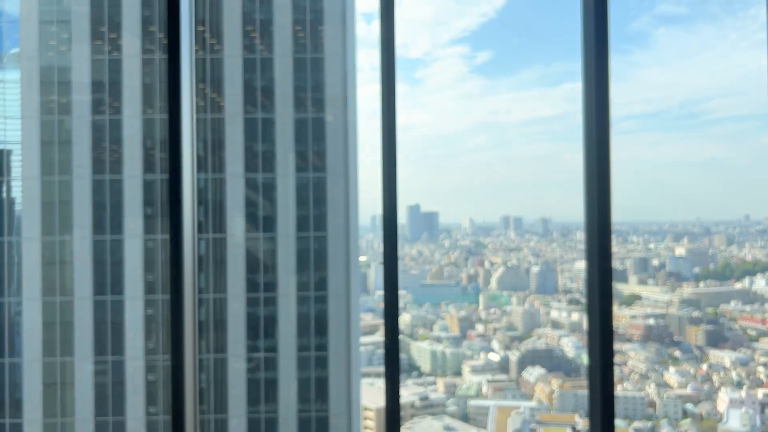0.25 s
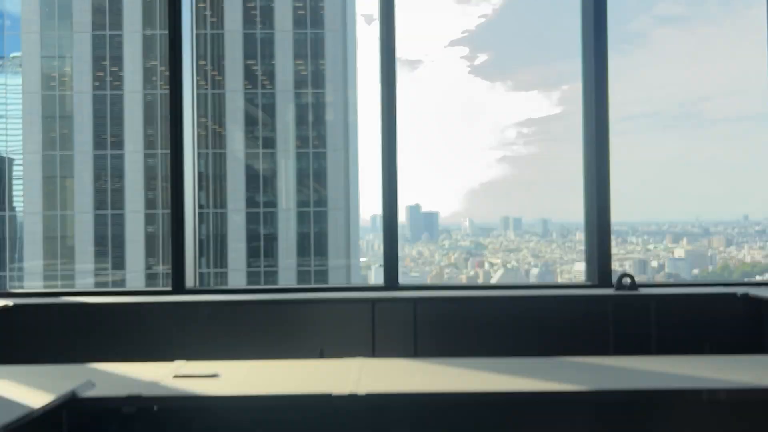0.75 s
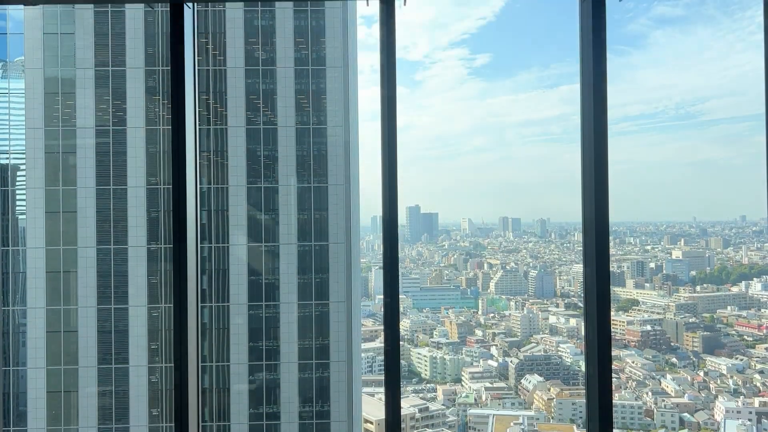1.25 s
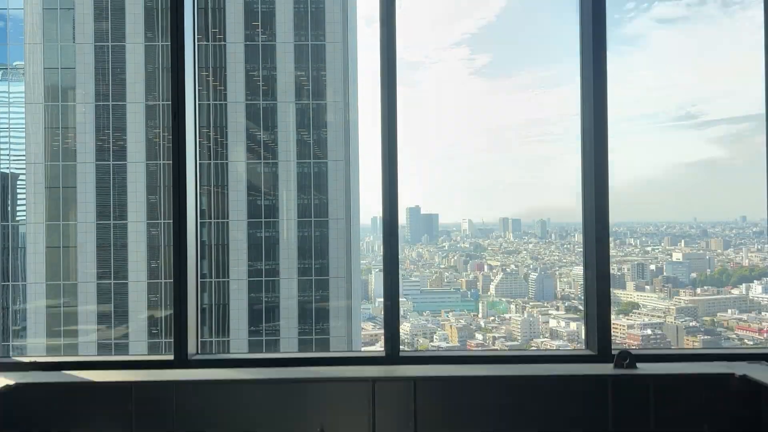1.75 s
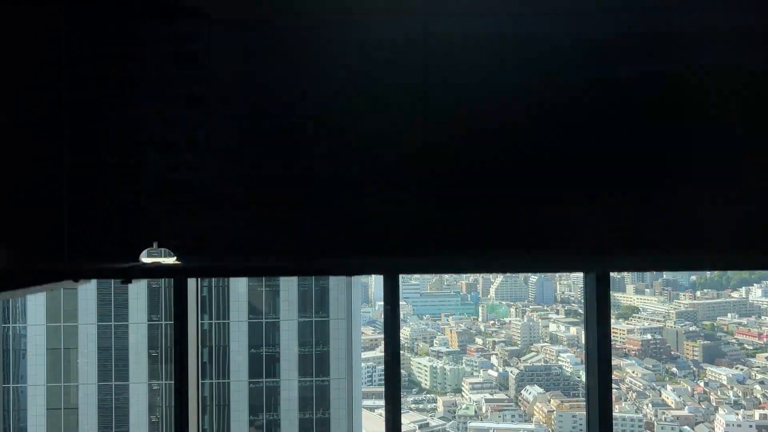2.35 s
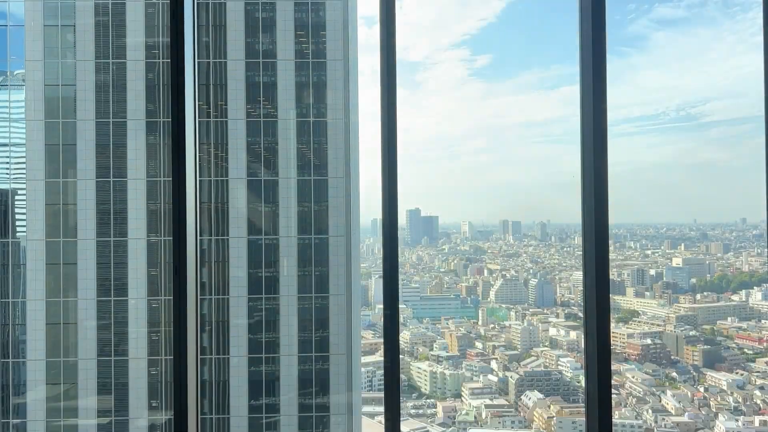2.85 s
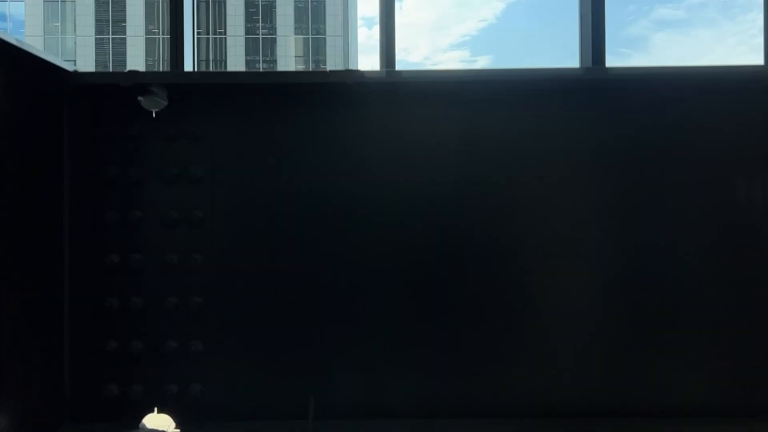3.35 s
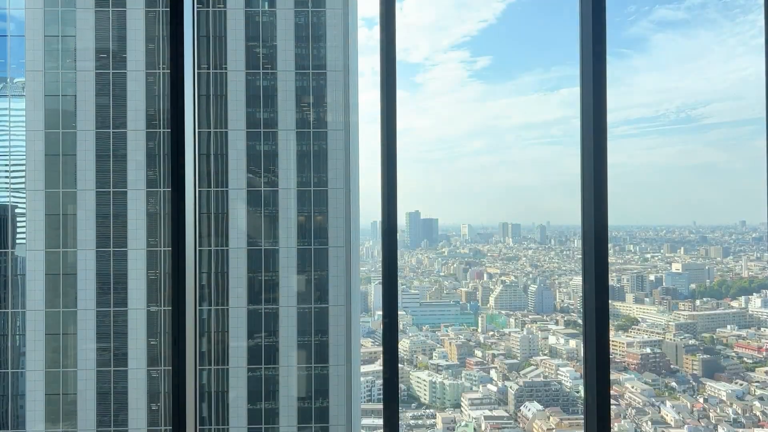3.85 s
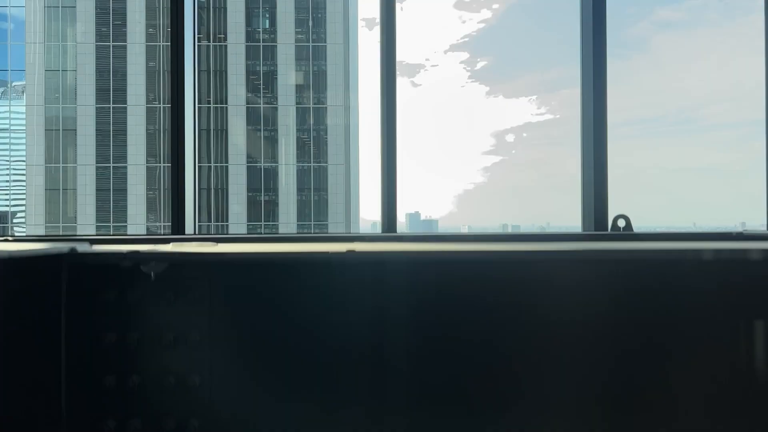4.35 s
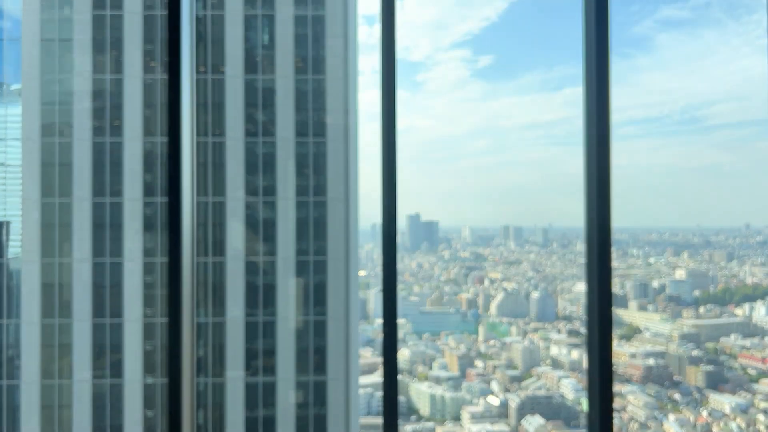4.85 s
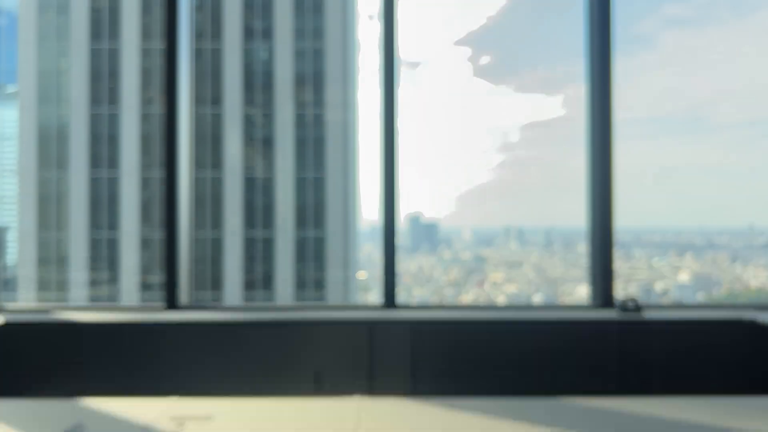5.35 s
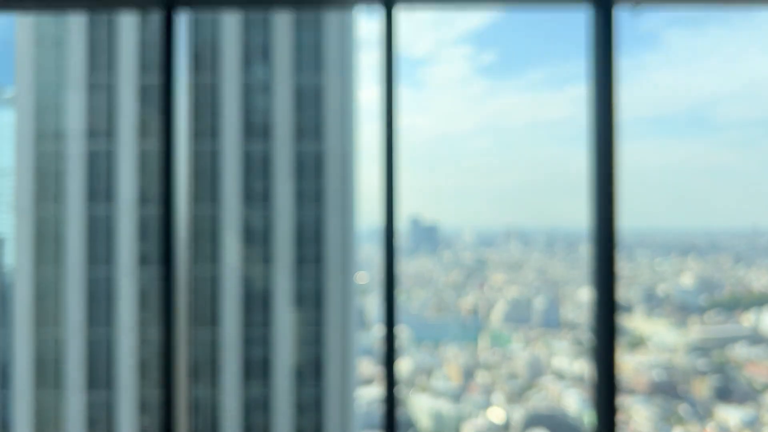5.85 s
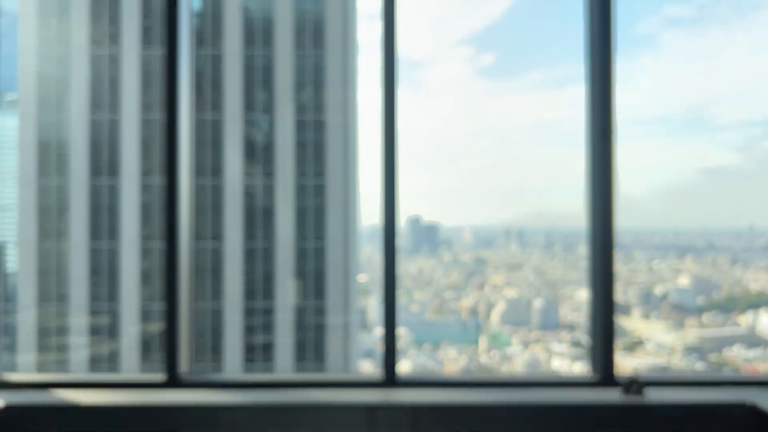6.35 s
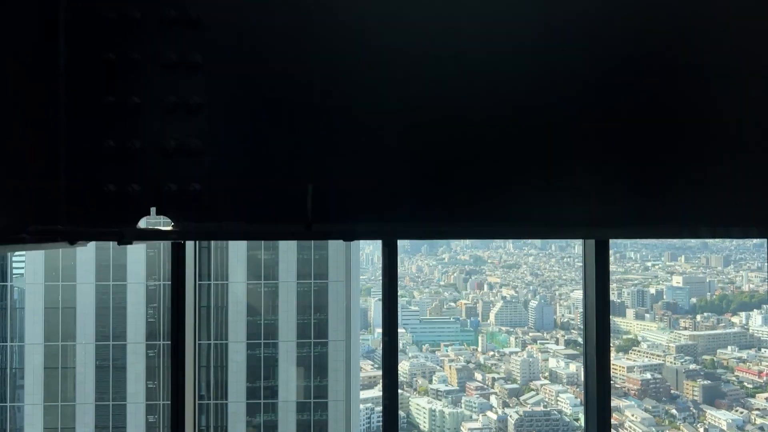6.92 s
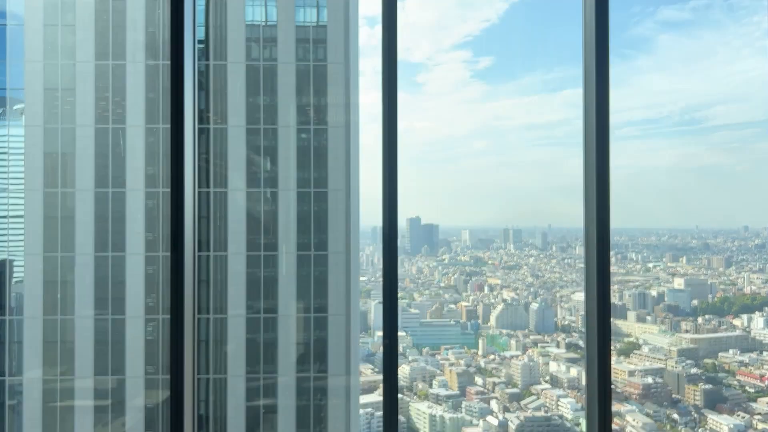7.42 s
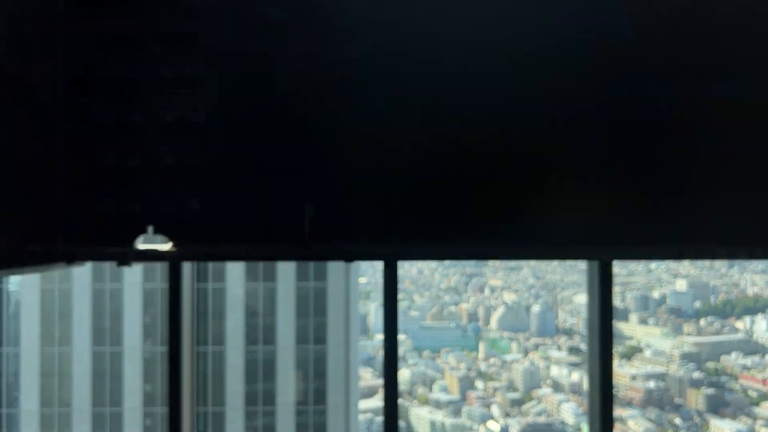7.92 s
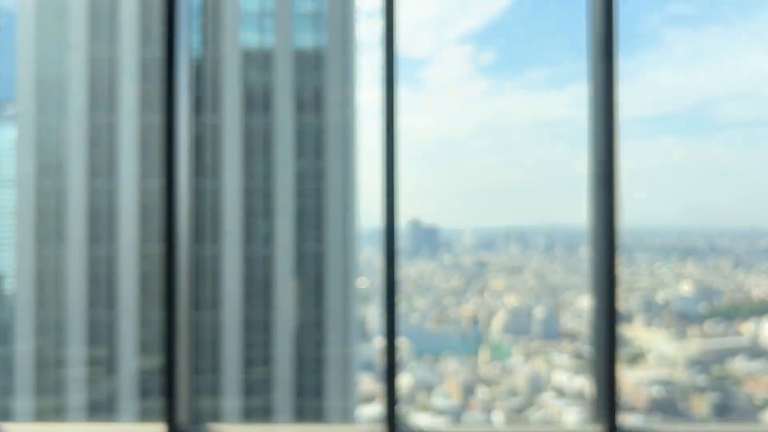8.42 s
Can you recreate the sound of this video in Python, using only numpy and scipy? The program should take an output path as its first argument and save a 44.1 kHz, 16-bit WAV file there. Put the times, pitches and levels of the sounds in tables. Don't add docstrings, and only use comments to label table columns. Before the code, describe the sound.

Steady deep elevator drone with airy shaft rush swelling towards the end, a brief thin squeal midway and small handling taps near the microphone.

```python
import sys
import numpy as np
from scipy import signal
from scipy.fft import rfft, irfft, next_fast_len
from scipy.io import wavfile
from scipy.ndimage import uniform_filter1d

SR = 44100
rng = np.random.default_rng(int(sys.argv[2]) if len(sys.argv) > 2 else 0)


def volts_from_db(level):
    exponent = np.asarray(level, float) / 20
    return 10 ** exponent


def to_wav(sig):
    pcm = np.clip(np.atleast_2d(sig), -1, 1) * 32767
    pcm = np.round(pcm).astype(np.int16)
    wavfile.write(sys.argv[1], SR, pcm.T)


N = 382770
T = np.arange(N) / SR


def hum(shake):
    # (time [s], pitch [Hz], level [dB], throb depth [0-1])
    drive = [(0.0, 127, -44, 0.8), (.3, 127.8, -36.5, 0.4), (1.0, 128.6, -35, 0.8), (1.4, 128.4, -30.5, .4),
             (1.75, 125, -35.5, 0.9), (2.12, 127.6, -37.5, 0.6), (2.3, 128.7, -29, 0),
             (2.65, 128.5, -36.5, 0.2), (3.1, 124, -34.5, 0.8), (3.7, 128, -37, 0.4),
             (4.3, 127.2, -31.5, 0), (4.65, 128.4, -41, .5), (5.05, 127.5, -29.5, 0.1), (5.4, 125, -42, .3),
             (5.55, 127.3, -29, 0), (6.7, 127.9, -33, 0.1), (7.25, 124.3, -27, .2), (7.36, 122, -45, 0)]
    # (centre [Hz], width [Hz], rms level [dB])
    cab_modes = [(66, 7.1, -47), (78.7, 5.7, -52), (103, 5, -43), (112.1, 10, -45), (128, 14, -44.5)]
    # (start [s], length [s], pitch [Hz], level [dB])
    surges = [(0, 0.11, 60.9, -39.5), (0.485, 0.25, 69.2, -48), (0.857, 0.97, 63.8, -43.5),
              (0.949, .12, 103, -31.5), (1.551, 0.16, 110.4, -38.5), (1.902, 0.54, 64, -38.5),
              (1.95, 0.13, 114.3, -31.5), (2.35, 0.12, 78, -33), (2.64, 0.068, 112, -36),
              (2.814, 0.11, 77.4, -30.5), (3.63, 0.12, 91.7, -27.5), (4.088, 0.55, 84, -42),
              (4.154, .25, 107.6, -34), (4.5, 0.33, 103, -36), (4.851, .75, 103, -40),
              (5.144, .38, 51.3, -36), (5.919, .35, 66.1, -39.5), (6.296, .8, 103, -40.5),
              (6.297, 0.6, 69, -39), (7.189, 0.17, 112.9, -31), (7.196, 0.22, 72, -37.5),
              (7.43, 0.16, 63, -38), (7.551, 0.099, 117.5, -29), (8.16, .14, 104, -33),
              (8.33, .2, 98.9, -32), (3.0, 0.28, 190, -44), (7.75, 0.19, 112.5, -38.5),
              (8.302, 0.15, 65, -36.5), (8.5, 0.17, 128, -33.5), (8.552, 0.18, 102, -33.5)]
    brake_s, sag_hz_per_s = 7.36, 15
    throb_hz, throb_peak_s = 6.45, 0.5827

    hz, level_db, depth = curves(drive)
    hz = hz - sag_hz_per_s * np.maximum(T - brake_s, 0)
    throb = 1 + np.clip(depth, 0, 1) * np.cos(2 * np.pi * throb_hz * (T - throb_peak_s))
    out = volts_from_db(level_db) * throb * wavering(hz, shake, clean=0.85, fuzz=0.11, width=17)
    for mode_hz, width, db in cab_modes:
        out += volts_from_db(db) * evened(resonate(shake, mode_hz, width))
    for start, length, surge_hz, db in surges:
        part = slice(round(start * SR), round((start + length) * SR))
        pitch = surge_hz * np.ones(N)[part]
        surge = wavering(pitch, shake[:, part], clean=0.62, fuzz=0.25, width=39)
        fade = signal.windows.tukey(surge.shape[1], min(0.13 / length, 1))
        out[:, part] += volts_from_db(db) * fade * surge
    return out


def rumble(shake):
    # (centre [Hz], width [Hz], rms level [dB])
    panels = [(54.3, 12, -40), (152.5, 24, -44), (181, 6, -52), (236.2, 5, -53), (306.6, 5, -55),
              (337, 39, -67), (734, 21, -68), (833, 15, -73.5), (891, 26, -69.5)]
    # (frequency [Hz], density [dB per Hz])
    drone = [(20, -36.5), (32, -25.5), (45, -9.5), (70, -5.5), (128, -6), (160, -7.5), (200, -13),
             (312, -20), (420, -26.5), (700, -41), (1000, -76.5)]
    drone_db = -38.5

    def panel_gain(hz):
        gain = 0
        for centre, width, db in panels:
            peak = 1 / (1 + (2 * (hz - centre) / width) ** 2)
            gain = gain + volts_from_db(db) * np.sqrt(SR / width) * peak
        return gain

    return 0.22 * shaped(shake, panel_gain) + volts_from_db(drone_db) * noise(drone, 1.3, size=4096)


def air():
    # (time [s], gust [dB])
    gusts = [(0.0, 0), (.5, -1.24), (2.55, 0.5), (2.8, -0.4), (3.9, 0.1), (4.3, 2), (4.65, -0.5), (5.1, .5),
             (5.58, 3), (6.0, .5), (6.84, 4), (7.25, 4), (7.9, 3.5), (8.27, 6.5), (8.46, 4.5), (8.68, 6)]
    # (frequency [Hz], density [dB per Hz])
    roar = [(240, -26), (400, -3.5), (606, -9), (860, -5), (942, -11.5), (1060, -6.5), (1450, -23.5),
            (1880, -45.5), (3190, -120)]
    hiss = [(790, -35), (1350, -6), (2100, -2), (2440, -6.5), (3050, -14.5), (3960, -32.5), (6710, -120)]
    fizz = [(2000, -21), (2900, -11), (3500, 2.5), (5100, 2.5), (5700, -2.5), (6600, -4.5), (6900, -6),
            (7500, -9.5), (9600, -17.5), (10500, -29.5), (12000, -51.5)]
    climb_db_per_s = 0.36

    gust_db, = curves(gusts)
    roar_db = -58 + 1.03 * gust_db
    hiss_db = -60 + 0.72 * gust_db
    fizz_db = -72.5 + 0.13 * gust_db ** 2 + climb_db_per_s * T
    out = volts_from_db(roar_db) * noise(roar, 1.0)
    out += volts_from_db(hiss_db) * noise(hiss, 0.68)
    out += volts_from_db(fizz_db) * noise(fizz, 1.4)
    return out


def squeak():
    # (time [s], pitch [Hz], level [dB])
    shoe = [
        (3.06, 5100, -82),
        (3.12, 5185, -72),
        (3.34, 5180, -68.5),
        (3.4, 5165, -74),
        (3.54, 5150, -70.5),
        (3.71, 5165, -71),
        (3.76, 5070, -78),
        (3.83, 5125, -75),
        (3.9, 5090, -81),
    ]
    span = slice(round(shoe[0][0] * SR), round(shoe[-1][0] * SR))
    hz, level_db = (curve[span] for curve in curves(shoe))
    grit = rng.standard_normal((3, len(hz)))
    jitter_hz = 24 * evened(uniform_filter1d(grit[2], size=500))
    whistle = np.sqrt(2) * np.sin(2 * np.pi * np.cumsum(hz + jitter_hz) / SR)
    haze = evened(resonate(grit[0], hz, 80))
    neighbour = evened(resonate(grit[1], hz * 0.965, 200))
    sound = whistle + 0.61 * haze + 0.6 * neighbour
    flutter_db = 1.8 * evened(uniform_filter1d(grit[0], size=400))
    envelope = volts_from_db(level_db - 5.5 + flutter_db) * signal.windows.tukey(len(hz), 0.05)
    out = np.zeros((2, N))
    out[:, span] = envelope * sound * volts_from_db([[-2.5], [2.4]])
    return out


def ticks():
    # (time [s], peak level [dB], ring [Hz], snap level [dB], snap [Hz])
    taps = [(2.811, -44, 478, -15, 916), (3.119, -38, 420, -18, 800), (3.67, -26, 617, -2.5, 1620),
            (3.6839, -31, 895, 1, 1790), (3.961, -46, 800, -8, 1400), (4.112, -31, 670, -8, 1000),
            (4.2172, -37, 860, -20, 1200), (4.243, -34, 600, -7, 950), (4.475, -44, 560, -14, 1100),
            (4.717, -37, 520, -14, 750), (5.315, -40, 900, -10, 1500), (5.3269, -28.5, 597, -7.5, 1940),
            (5.756, -34.5, 512, -19, 778.5), (8.063, -43.5, 714, -5.5, 1902), (8.314, -30.5, 620, -8, 1630)]
    out, t = np.zeros((2, N + 2000)), np.arange(2000) / SR
    for s, db, hz, snap_db, snap_hz in taps:
        pan_db = -12.5 + 0.84 * (-25 - db)
        ring_time = t + 0.00056 * (1 - np.exp(-t / 0.00028))
        ring = np.sin(2 * np.pi * hz * ring_time) * swell(t, 0.0011)
        snap = -np.sin(2 * np.pi * snap_hz * t) * volts_from_db(snap_db) * swell(t, 0.00041)
        crack = uniform_filter1d(rng.standard_normal(2000), size=4)
        crack = crack * volts_from_db(snap_db - 18.5) * swell(t, 0.00064)
        knock = -np.sin(2 * np.pi * 0.5 * hz * t) * volts_from_db(-4.5) * swell(t, 0.0012)
        thump_turns = 125 * t + 1.4 * (1 - np.exp(-t / 0.0053))
        thump_db = -3 + 0.6 * (db + 26.5)
        thump = -np.sin(2 * np.pi * thump_turns) * volts_from_db(thump_db) * swell(t, 0.0065)
        tick = ring + snap + knock + thump + crack
        out[:, round(s * SR):][:, :2000] += volts_from_db(db - 1.8) * tick * volts_from_db([[pan_db / 2], [-pan_db / 2]])
    return out[:, :N]


def brushes():
    # (time [s], level [dB], centre [Hz], width [Hz], hold [s])
    rubs = [(1.683, -58.5, 1300, 500, .04), (1.683, -62, 2000, 1200, .03), (5.625, -72.5, 6200, 3200, .03),
            (8.05, -69, 7000, 7000, .004), (8.054, -72.5, 5800, 3000, .07), (8.1, -71.5, 6200, 1800, .33),
            (8.058, -58, 900, 900, .04), (5.43, -88, 8500, 3000, .03), (6.236, -73, 6700, 1000, .035),
            (6.236, -73.5, 8600, 2000, .05), (7.07, -80, 9000, 5000, .01), (7.078, -73, 9000, 1700, .045),
            (6.236, -88, 11500, 2000, .025), (1.24, -84, 6800, 2500, .04), (1.69, -84, 7000, 2500, .03),
            (6.68, -83, 8000, 2500, .03), (7.34, -86, 7500, 3000, .04), (7.83, -77.5, 7000, 2500, .07)]
    out = np.zeros((2, N + SR))
    t = np.arange(26000) / SR
    for s, db, hz, width, hold in rubs:
        rise, t60 = 0.12 * hold, 0.14 + 3.5 * hold
        a, b, grain = rng.standard_normal((3, len(t)))
        rub = evened(resonate(np.array([a, 0.8 * a + 0.6 * b]), hz, width))
        fall_db = 60 * np.maximum(t - rise - hold, 0) / t60
        grain_db = 3 * evened(uniform_filter1d(grain, size=120))
        onset = np.sin(np.pi / 2 * np.minimum(t / rise, 1)) ** 2
        out[:, round(s * SR):][:, :len(t)] += rub * volts_from_db(db - fall_db + grain_db) * onset
    return out[:, :N]


def whines():
    # (frequency [Hz], rms level [dB])
    tones = [(8344, -103.5), (8979, -107), (9475, -103), (9728, -103)]
    out = 0
    for hz, db in tones:
        out = out + volts_from_db(db) * np.sqrt(2) * np.sin(2 * np.pi * (hz * T + rng.random()))
    return out


def self_noise():
    # (frequency [Hz], density [dB per Hz])
    spectrum = [(6000, -30.5), (8500, -6), (10000, -4.5), (11900, 1.5), (13000, -9), (14000, -29)]
    return volts_from_db(-90.5) * noise(spectrum, 1.5, size=512).mean(0) * 0.77


def noise(spectrum, patchy_db, size=1024):
    # (frequency [Hz], likeness [0-1])
    alike = [(30, .998), (48, .99), (90, .8), (130, .7), (300, .76), (520, .25), (900, .1), (2200, .55),
             (5000, .1), (8500, .7), (11000, .9)]
    frames, hz = 4 * N // size + 5, np.fft.rfftfreq(size, 1 / SR)
    a, b, c, d, patches = rng.standard_normal((frames, len(hz), 5)).T
    patches = uniform_filter1d(patches, size=14, axis=0)
    patches = evened(uniform_filter1d(patches, size=10, axis=1))
    same = np.clip(read(alike, hz), -1, 1)[:, None]
    left = a + 1j * b
    right = same * left + np.sqrt(1 - same ** 2) * (c + 1j * d)
    z = np.array([left, right])
    z *= volts_from_db(read(spectrum, hz)[:, None] + patchy_db * patches)
    return evened(signal.istft(z, nperseg=size, noverlap=3 * size // 4)[1][:, :N])


def wavering(hz, shake, clean, fuzz, width):
    tone = np.sqrt(2) * np.sin(2 * np.pi * np.cumsum(hz) / SR)
    return clean * tone + fuzz * evened(resonate(shake, hz, width))


def resonate(x, hz, width):
    turn = np.exp(2j * np.pi * np.cumsum(hz * np.ones(x.shape[-1])) / SR)
    r = np.exp(-np.pi * width / SR)
    twice = np.convolve([1, -r], [1, -r])
    smooth = signal.lfilter([(1 - r) ** 2], twice, x * turn.conj())
    return 2 * (turn * smooth).real


def shaped(x, gain):
    size = next_fast_len(N + 8192)
    return irfft(rfft(x, size) * gain(np.fft.rfftfreq(size, 1 / SR)), size)[..., :N]


def swell(t, peak):
    return t / peak * np.exp(1 - t / peak)


def evened(x):
    return x / np.sqrt(np.mean(x ** 2) + 1e-20)


def read(points, hz):
    f, value = np.transpose(points)
    return np.interp(np.log(hz + 1), np.log(f + 1), value)


def curves(rows):
    s, *columns = np.transpose(rows)
    return [np.interp(T, s, column) for column in columns]


def scene():
    # (frequency [Hz], left over right [dB])
    balance = [(30, -0.7), (50, 1.7), (90, -1), (140, -5), (210, -0.1), (1100, -0.5), (2600, -5),
               (5000, -3.5), (7000, -7), (9000, 0)]
    shake = noise([(20, -4.0), (1500, 10.5), (2500, -57.5)], 0.78, size=2048)
    steady = hum(shake) + rumble(shake) + air()

    def placing(hz):
        half_db = read(balance, hz) / 2
        delay_s = np.array([[3e-5], [0]])
        return volts_from_db([half_db, -half_db]) * np.exp(-2j * np.pi * hz * delay_s)

    return shaped(steady, placing) + squeak() + ticks() + brushes()


def top_cut(x):
    return signal.sosfilt(signal.butter(12, 13300, fs=SR, output="sos"), x)


def record(dry):
    # (frequency [Hz], gain [dB])
    dark_band = [(9950, 0), (10200, -18), (10900, -22.5), (11100, -1.5)]
    heard = dry + whines() + self_noise()
    coloured = shaped(heard, lambda hz: volts_from_db(read(dark_band, hz)))
    closing = np.minimum((N - np.arange(N)) / 130, 1)
    return top_cut(coloured * closing)


dry = scene()
out = record(dry)
to_wav(out)
```